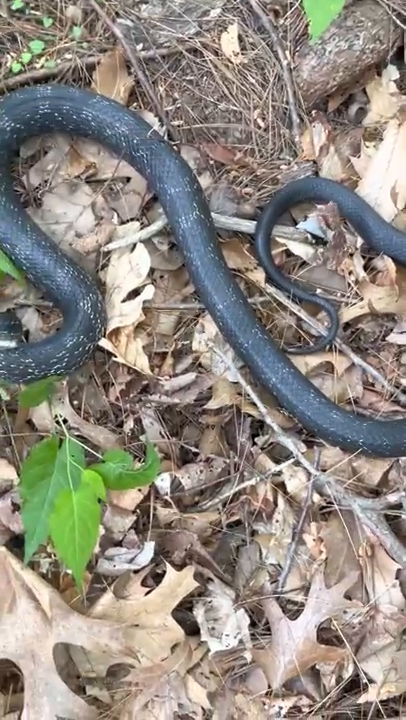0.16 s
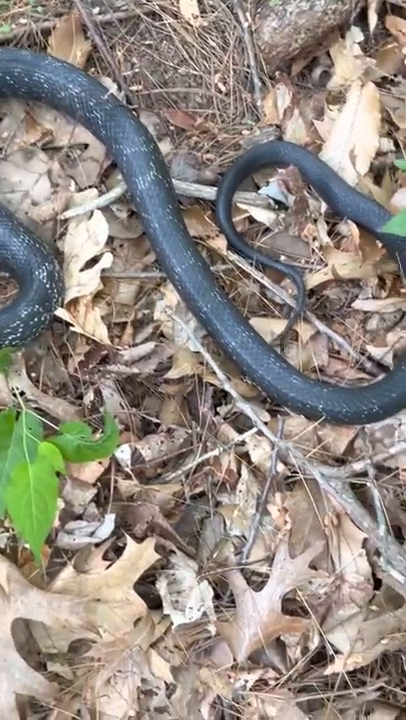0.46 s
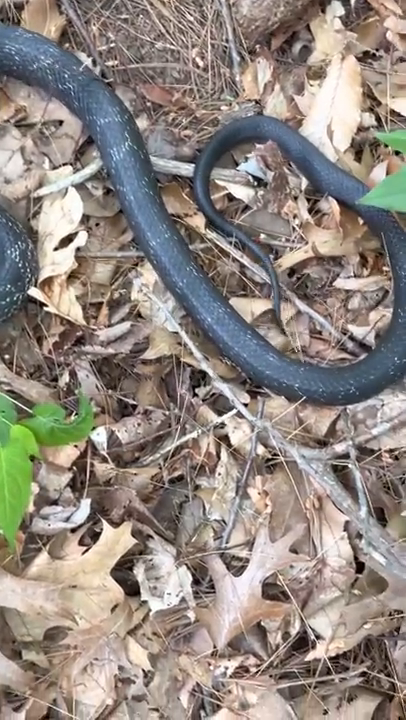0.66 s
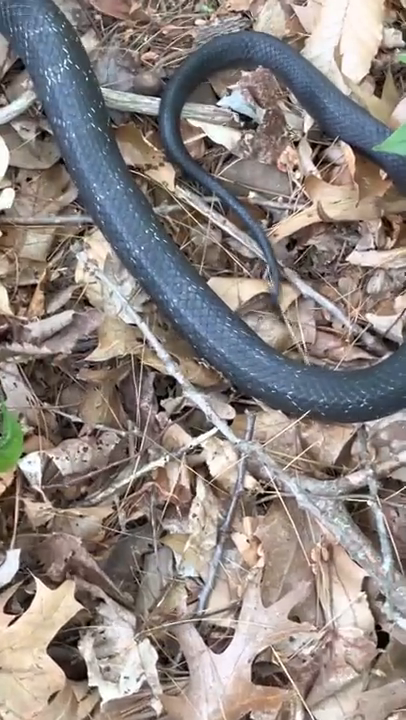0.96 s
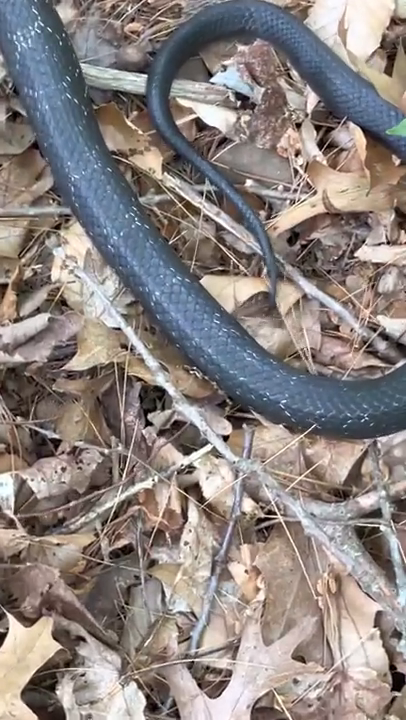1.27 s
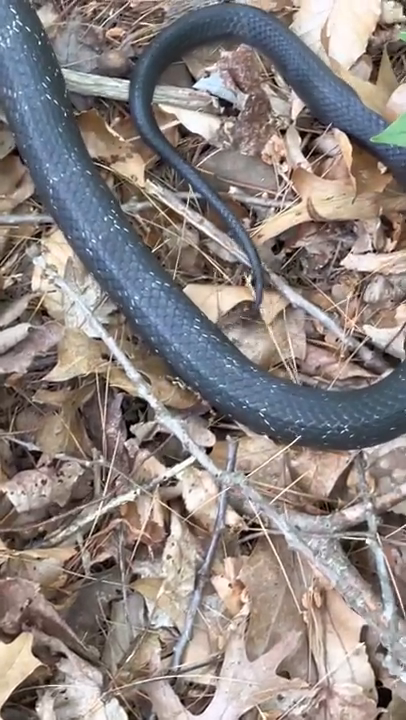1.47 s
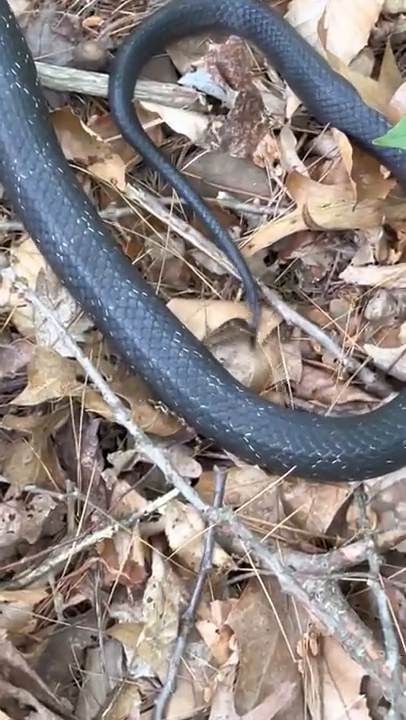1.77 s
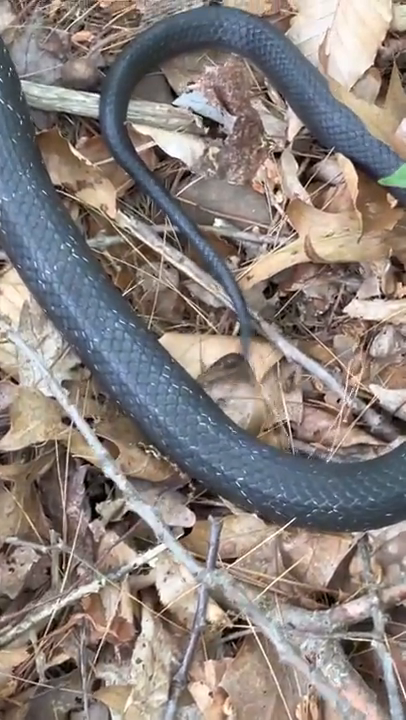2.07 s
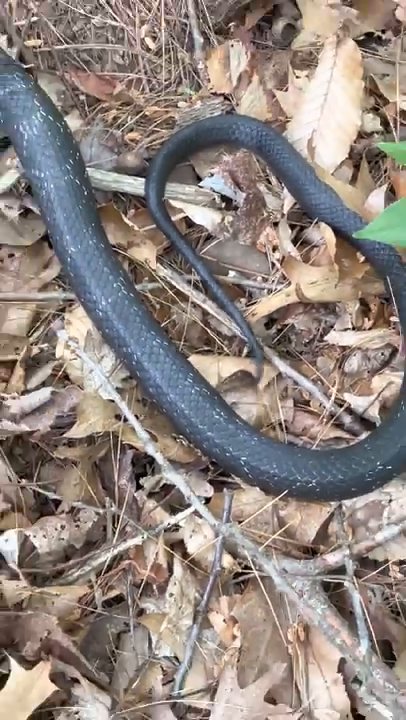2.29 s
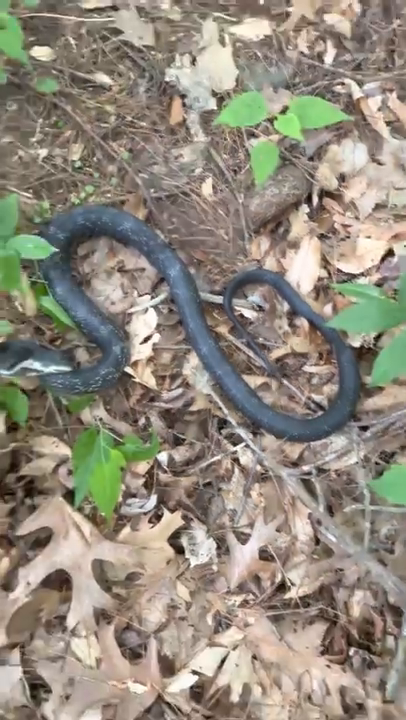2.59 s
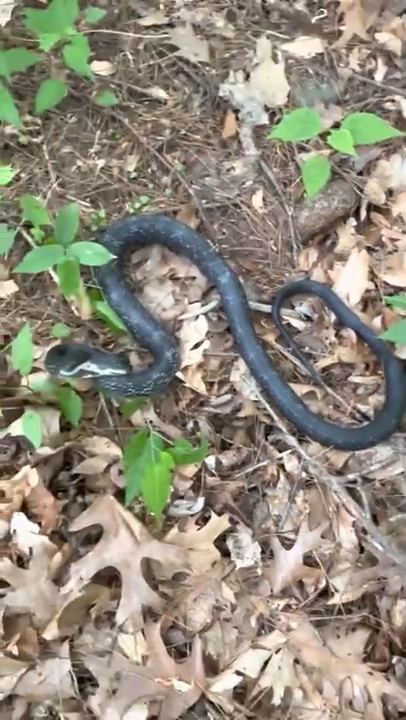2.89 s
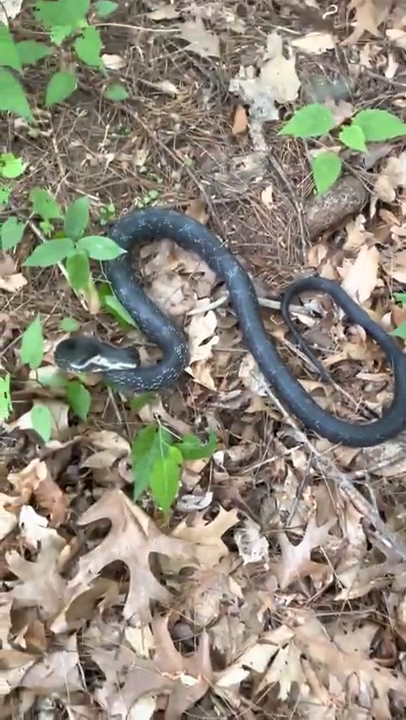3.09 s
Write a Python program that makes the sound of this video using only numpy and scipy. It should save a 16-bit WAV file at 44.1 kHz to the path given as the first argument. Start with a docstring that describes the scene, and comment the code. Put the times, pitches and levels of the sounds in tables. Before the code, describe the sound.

Close up in the woods, leaves and twigs tick lightly before a snake starts vibrating its tail in the dry litter. The rapid, papery rattle swells, then softens a little, with a faint far rumble and hiss behind.

```python
"""A far low rumble sounds under a steady background hiss, and dry leaves and twigs snap. The litter rustles
as a snake shivers its tail in it, about 35 swings a second, striking one leaf going out and another coming
back. Each impact excites the leaf's broad resonances; the hardest strokes slap. A phone's two microphone
ports give the hiss a bright peak near 11 kHz and add a phase offset that grows, unevenly, with frequency."""
import sys
import numpy as np
from scipy import signal
from scipy.fft import rfft, irfft, next_fast_len
from scipy.io import wavfile
from scipy.ndimage import uniform_filter1d

SR = 44100
rng = np.random.default_rng(int(sys.argv[2]) if len(sys.argv) > 2 else 0)


def master(y):
    """Save y as 16-bit WAV."""
    cut = np.clip(np.atleast_2d(y).T, -1, 1)
    pcm = np.round(cut * 32767)  # scale
    wavfile.write(sys.argv[1], SR, pcm.astype(np.int16))


N = 143325


def amp(db):
    """Amplitude ratio of a level in decibels."""
    return 10 ** (np.asarray(db) / 20)


def rms_one(x):
    """Normalisation to unit mean power."""
    return x / np.sqrt(np.mean(x ** 2) + 1e-20)


def read(rows, at):
    """Linear interpolation of a table's columns along its first."""
    axis, *columns = np.transpose(rows)
    return [np.interp(at, axis, c) for c in columns]


def colour(x, spectrum):
    """Spectral shaping: x is weighted by a spectrum and silent outside it."""
    hz, db = np.transpose(spectrum)
    grid = np.arange(N // 2 + 1) * SR / N + 1
    return irfft(rfft(x) * amp(np.interp(np.log(grid), np.log(hz), db, -120, -120)), N)


# envelope of the far rumble: (time [s], level [dB])
RUMBLE_LEVEL = [(0.0, -47), (1.29, -47.5), (2.87, -43.5), (3.25, -46)]
# spectra of the rumble and of the hiss: (frequency [Hz], relative density [dB])
RUMBLE_SPECTRUM = [(12, -55), (25, -31), (36, -21), (49, -4), (81, 1.5), (123, -4), (145, -9), (232, -14.5),
                   (308, -24), (500, -30.5), (650, -50)]
HISS_SPECTRUM = [(250, -4), (500, 0), (1500, -4.5), (3000, -7), (5500, -14.5), (7500, -6), (9000, -12),
                 (11000, -3), (12200, -22), (13500, -37), (16000, -47)]

def background():
    """Filtered white noise: a drifting far rumble, and steady hiss with a microphone peak near 11 kHz."""
    rumble_db, = read(RUMBLE_LEVEL, np.arange(N) / SR)
    rumble, hiss = rng.standard_normal((2, 2, N))
    rumble = amp(rumble_db) * rms_one(colour(rumble, RUMBLE_SPECTRUM))
    hiss = amp(-58) * rms_one(colour(hiss, HISS_SPECTRUM))
    return rumble + hiss


def grit(shape, per_s, spread_db):
    """Shot noise: random clicks of uneven size over a trace of hiss."""
    sizes = amp(spread_db * np.minimum(rng.exponential(1, shape), 5)) * rng.choice([-1, 1], shape)
    return sizes * (rng.random(shape) < per_s / SR) + 0.011 * rng.standard_normal(shape)


def resonate(x, hz, width_hz):
    """Heavily damped resonance; each row comes out with unit energy."""
    sos = signal.butter(1, [max(hz - width_hz / 2, 50), hz + width_hz / 2], "band", fs=SR, output="sos")
    y = signal.sosfilt(sos, signal.sosfilt(sos, x))
    return y / np.sqrt(np.sum(y ** 2, axis=-1, keepdims=True))


def impacts(times, levels_db, modes, envelope, grain_db, knock_db, knock_sample=28):
    """Modal superposition: a knock and a gritty burst drive each resonance. Rows: direct, indirect."""
    contact = envelope * grit((len(times), 2, envelope.shape[-1]), per_s=25000, spread_db=grain_db)
    knock = np.zeros_like(contact)
    knock[:, 0, knock_sample] = amp(knock_db)   # a clean impulse, on the direct path only
    bursts = 0
    for k, (db, (hz, width_hz)) in enumerate(zip(levels_db, modes)):
        force = contact + knock * (3000 / hz) ** 0.58   # the knock weighs more in low resonances
        bursts += (-1) ** k * amp(db)[:, None, None] * resonate(force, hz, width_hz)
    out = np.zeros((2, N + SR))
    samples = (times * SR).astype(int)[:, None] + np.arange(envelope.shape[-1])
    for path in range(2):
        np.add.at(out[path], samples, bursts[:, path])
    return out[:, :N]


# single snaps: (time [s], relative level [dB], treble share [dB], low share [dB], middle share [dB])
SNAPS = [(0.022, -37, -6.5, -29, -17), (0.0475, -40.5, -13, -3, -25), (0.0797, -41.5, -12, -18, -15),
         (0.1096, -50, -4, -12, -15), (0.139, -28, -7.5, -33, -21), (0.1496, -38, -4.5, -17, -12),
         (0.3732, -41, -18, -24, -6.5), (0.383, -45, -8, -16, -6), (0.4208, -34.5, -6.5, -29, -7.5),
         (0.4465, -42.5, -0.5, -20, -8), (0.4665, -45.5, -1, -14, -4), (0.4984, -24.5, -22, -14, -6),
         (0.5423, -30, -17, -19, -9), (2.6095, -30, -5, -30, -21)]
# low, middle and treble resonances of a snap: (frequency [Hz], bandwidth [Hz])
SNAP_MODES = [(1600, 1540), (4600, 5100), (11000, 2000)]

def snaps():
    """Impulsive excitation: leaves and twigs crack, each with its own balance of three resonances."""
    times, db, treble_db, low_db, middle_db = np.transpose(SNAPS)
    levels_db = 17.5 + db + np.array([low_db, middle_db, treble_db])
    decay_s = 0.0019
    envelope = np.exp(-np.arange(512) / (decay_s * SR))
    return impacts(times, levels_db, SNAP_MODES, envelope, grain_db=3.6, knock_db=-1)


# envelope of the shaken litter: (time [s], relative treble level [dB], relative middle level [dB])
RUSTLE_LEVELS = [(0.3, -80, -62), (0.46, -63, -63), (0.53, -48, -50), (0.65, -40, -45.5),
                 (0.71, -46.5, -51.5), (1.1, -41.5, -46.5), (1.28, -41.5, -47), (1.61, -42.5, -46),
                 (1.85, -41, -45), (2.0, -42, -46), (2.21, -45.5, -50), (2.55, -43, -47.5),
                 (2.83, -52.5, -51), (3.25, -43.5, -46)]
# spectra of its two bands: (frequency [Hz], relative density [dB])
RUSTLE_TREBLE = [(6000, -13), (7800, -17.5), (9000, -2), (10500, 1.5), (11600, -1), (12500, -2.5),
                 (14000, -10), (16000, -22)]
RUSTLE_MIDDLE = [(350, -5), (1200, -7.5), (2600, -1.5), (4000, 2.5), (5200, -2), (7000, -2), (8000, -4)]

def rustle():
    """Modulated shot noise: clicks of shaken leaves merge into a fine crackle that comes in patches."""
    treble_db, middle_db = read(RUSTLE_LEVELS, np.arange(N) / SR)
    drift = uniform_filter1d(rng.standard_normal(N), size=400)
    patches_db = 3 * rms_one(uniform_filter1d(drift, size=400))
    clicks = grit((2, N), per_s=9000, spread_db=3) * amp(patches_db)
    bands = [(treble_db, RUSTLE_TREBLE), (middle_db, RUSTLE_MIDDLE)]
    return sum(amp(db - 5) * rms_one(colour(clicks, spectrum)) for db, spectrum in bands)


# speed of the tail: (time [s], swing rate [Hz])
SWING_RATE = [(0.47, 35.82), (0.669, 36.73), (0.867, 38.74), (1.066, 35.53), (1.264, 36.21), (1.463, 34.96),
              (1.661, 36.14), (1.86, 34.45), (2.059, 35.25), (2.257, 33.84), (2.456, 33.75), (2.654, 33.61),
              (2.853, 33.41), (3.051, 33.44), (3.25, 32.52)]
# the tiring tail swings lopsided and slips once: (time [s], outward delay [s], return delay [s])
STROKE_DELAY = [(2.2, 0, 0), (2.3, .003, 0), (2.585, .005, 0), (2.6, .015, .011), (2.9, .017, .011),
                (3.25, .017, .010)]

def stroke_times():
    """Phase is the integral of frequency: the tail lands once every half cycle, later as it tires."""
    t = np.arange(N) / SR
    first_stroke_s = 0.4835
    half_cycles = 2 * np.cumsum(read(SWING_RATE, t)[0]) / SR
    half_cycles -= np.interp(first_stroke_s, t, half_cycles)
    times = np.interp(np.arange(int(half_cycles[-1])), half_cycles, t)
    for side in range(2):
        times[side::2] += read(STROKE_DELAY, times[side::2])[side]
    return times


# relative strength of strikes on each leaf: (time [s], low [dB], low-mid [dB], high-mid [dB], treble [dB])
OUTWARD_LEVELS = [(0.47, -48, -49, -66, -47), (0.53, -54, -62, -53, -54), (0.58, -47, -46, -33, -34.5),
                  (0.72, -44, -49, -49, -45), (0.9, -42, -47, -45.5, -49), (1.03, -48, -50.5, -44.5, -47),
                  (1.09, -36, -37, -31.5, -35.5), (1.23, -42, -40.5, -37, -39), (1.3, -45, -48, -37, -38),
                  (1.42, -46, -45, -33, -37), (1.5, -50, -43, -44, -44), (1.6, -54, -51, -47, -37),
                  (1.75, -58, -51, -62, -50), (1.9, -53, -45.5, -43, -39), (2.1, -44.5, -43, -36, -38),
                  (2.3, -57, -53.5, -50, -47), (2.6, -60, -53, -52, -42), (3.25, -54.5, -52, -43.5, -39)]
RETURN_LEVELS = [(0.47, -49, -27, -30, -30), (0.53, -55, -56.5, -57, -49), (0.58, -54, -59, -51, -54),
                 (0.72, -51, -51.5, -48.5, -44), (0.9, -51.5, -54, -46, -50), (1.03, -47, -52, -46, -40),
                 (1.09, -46, -48, -44, -41), (1.23, -55, -51, -46, -43), (1.3, -50, -51, -47, -54),
                 (1.42, -48, -40, -37, -35), (1.5, -58, -32.5, -37, -30), (1.6, -45, -31.5, -34, -28),
                 (1.9, -52, -43, -45, -35.5), (2.1, -67, -45.5, -45.5, -35), (2.3, -57, -47, -43, -36.5),
                 (2.6, -54, -48, -45.5, -39), (3.25, -49.5, -50.5, -44, -41.5)]
# the four resonances of each leaf, low to treble: (frequency [Hz], bandwidth [Hz])
OUTWARD_MODES = [(1300, 1800), (3300, 2350), (5100, 1950), (10300, 14000)]
RETURN_MODES = [(1200, 2040), (2800, 1400), (5700, 2900), (10500, 3500)]

def tail_strikes():
    """Impact and friction on two leaves in turn: hard strokes crack, soft ones mostly scrape."""
    strokes = stroke_times()
    slapped = np.abs(strokes[:, None] - np.array(SLAPS)[:, 0]).min(axis=1) < 0.007
    age = np.arange(1024) / SR
    attack_s, crack_s, jitter_s = 0.00024, 0.0011, 0.0004
    knock_db, hard_db = (14, 7), (-61, -48.5)   # pairs: outward leaf, return leaf
    scrape_db, scrape_s = (-13, -14), (0.0054, 0.012)
    attack = 1 - np.exp(-age / attack_s)
    leaves = [(OUTWARD_LEVELS, OUTWARD_MODES), (RETURN_LEVELS, RETURN_MODES)]
    out = 0
    for side, (strength, modes) in enumerate(leaves):
        times = strokes[side::2]
        strength_db = np.array(read(strength, times))
        chance = rng.standard_normal((200, 6))[:len(times)].T
        levels_db = strength_db + 20.5 + 0.36 * chance[4] + 0.9 * chance[:4]   # force and timbre vary
        levels_db[:, slapped[side::2]] = -120   # these strokes sound as slaps instead
        # a strike whose low band falls below hard_db loses crack and knock
        crisp_db = np.clip(2.1 * (strength_db[0] - hard_db[side]), -25, 0)
        crack = amp(crisp_db)[:, None, None] * np.exp(-age / crack_s)
        scrape = amp(scrape_db[side]) * np.exp(-(age / scrape_s[side]) ** 2)
        out += impacts(times + jitter_s * chance[5], levels_db, modes, attack * (crack + scrape),
                       grain_db=2.5, knock_db=knock_db[side] + crisp_db)
    return out


# hard slaps of the tail, as relative energy in five resonances and a share of scrape:
# (time [s], thump [dB], low [dB], low-mid [dB], high-mid [dB], treble [dB], scrape [dB])
SLAPS = [(0.5684, -32, -16.5, -22.5, -14.0, -22, -19), (0.5948, -27, -24.5, -29, -21, -18, -18),
         (0.6239, -25, -21, -24, -18, -22, -16), (0.6522, -26, -20, -28, -20, -23.5, -18),
         (0.678, -28, -20, -32, -15.5, -15.5, -7), (0.7053, -23, -21, -30, -26.5, -23, -7),
         (0.7318, -42, -23.5, -27.0, -28, -24.0, -12), (0.7576, -33.0, -22, -28.0, -24, -24.0, -3),
         (0.7862, -27, -21, -24, -27, -22, -17), (0.8124, -26, -23, -25, -32.5, -33.5, -25),
         (0.839, -29, -22, -21.5, -26.0, -29.5, -24), (0.8645, -27.0, -20, -35, -31, -29.0, -15),
         (0.891, -27, -24, -23, -27, -27, -12), (0.9166, -33, -24, -28, -28, -35, -12),
         (0.927, -39.5, -43.0, -29.5, -22, -18, -13), (0.943, -36.0, -23, -30.5, -25, -34, -2),
         (0.9701, -30, -23, -29, -23.0, -31.5, -17), (0.9968, -38.0, -28, -29, -35, -36, -19),
         (1.0252, -34, -25.5, -28.5, -26.0, -23.5, -5), (1.0515, -26, -19, -29, -23.5, -25, -5),
         (1.0799, -34, -15, -29, -11.5, -19.5, -38), (1.1075, -39, -15.5, -20, -15, -27, -16),
         (1.1348, -35, -17.5, -18, -15.5, -16.5, -19), (1.1617, -36, -16, -21, -14.5, -23, -18),
         (1.1885, -37, -20.5, -20.5, -14.5, -30, -16), (1.2155, -42, -17, -23, -25, -24, -9),
         (1.2453, -45, -18, -19.5, -8.5, -13, -41), (1.2723, -45, -26, -19.5, -18.5, -21, -5),
         (1.3002, -43, -19, -22.5, -18.5, -20, -4), (1.3336, -37.5, -25, -24, -16.5, -15, -18),
         (1.3552, -45, -22.0, -17.5, -22, -16, 1), (1.3838, -37.5, -23, -20.5, -14.5, -19, -3),
         (1.4119, -39, -23.5, -20, -15, -16, -4), (1.4263, -44, -26, -20, -15, -14, -8),
         (1.4733, -49, -31, -17.5, -27, -15, -19), (1.4832, -31, -27, -14.5, -20, -13, -11),
         (1.5, -47.0, -31, -15.5, -20.5, -16, -17), (1.5119, -30.0, -35, -10, -20, -12.5, -19),
         (1.5277, -50, -33, -22, -30, -21, -14), (1.5407, -27, -32, -12, -14, -8, -12),
         (1.5557, -45, -32, -27, -29, -33, -27), (1.5687, -35, -32, -9.5, -15.5, -7.5, -14),
         (1.584, -47, -38, -20, -33, -28, -19), (1.597, -36, -28, -9, -16.5, -9.5, -8),
         (1.6246, -30.0, -27, -12, -15.5, -6.5, -10), (1.6525, -27, -26, -12.5, -17.5, -9, -12),
         (1.6816, -35, -24.0, -18, -19, -12.5, -21), (1.7092, -31, -24.5, -13.5, -13.5, -7, -24),
         (1.7375, -27, -21.5, -16, -16.5, -11.5, -13), (1.766, -31, -22.5, -14.5, -15, -13.5, -12),
         (1.7958, -31, -28, -19, -16, -13.5, -11), (1.8095, -44, -41, -17.5, -27, -14, -17),
         (1.8242, -33.0, -28, -24, -24, -12.0, -19), (1.8366, -46.0, -36, -17, -22, -21, -12),
         (1.8524, -28.5, -23.0, -18, -15, -13, -14), (1.8821, -36.0, -29, -28.0, -11, -13.0, -14),
         (1.9089, -28, -27, -17, -20, -15, -13), (1.9516, -45.0, -34, -23.5, -18, -21, -29),
         (1.9672, -29.5, -30, -19.5, -20.5, -14.5, -13), (2.0078, -46.0, -40, -18, -18, -18.0, -27),
         (2.0248, -29, -25.0, -19, -17.5, -13.5, -6), (2.0668, -35, -31, -18, -17, -14, -28),
         (2.0949, -32.5, -33, -18.5, -20.0, -25, -10), (2.1236, -33, -28, -17.5, -21, -16, -17),
         (2.2854, -32, -39, -22, -23, -12, -13), (2.3127, -43, -41, -25, -20.5, -14.5, -7),
         (2.3727, -51, -39, -22, -21.5, -19, -4), (2.4024, -49.5, -41, -22.5, -19, -14.5, -1),
         (2.491, -47, -31.0, -22.5, -19.5, -16, -2), (2.5216, -43, -32, -18, -25, -15.5, -9),
         (2.5508, -48.0, -40, -24.5, -22, -17.5, -5), (2.5889, -43, -46, -26, -17.5, -9, -16),
         (2.6823, -31, -34, -26.0, -23, -20.0, -9), (2.7, -40, -34, -36, -37, -38, -26),
         (2.7308, -49, -37, -43, -38, -14.5, -40), (2.7608, -41, -32, -28.0, -21, -22, -25),
         (2.7737, -45.0, -44.5, -26, -26, -16.5, -15), (2.7915, -39, -30.0, -34, -27, -22, -32),
         (2.8214, -32, -38.0, -31.0, -35, -14, -39), (2.8329, -46.0, -32, -25.5, -22, -19.0, -2),
         (2.8513, -38, -33.0, -30.0, -27.0, -23.5, -16), (2.862, -38.0, -29.5, -23, -22, -17.5, -4),
         (2.8788, -37, -39, -28, -23, -25, -22), (2.9102, -33, -28.5, -26, -27, -26, -14),
         (2.94, -35, -31, -29, -22.5, -20, -28)]
# resonances of a slapped leaf, thump to treble: (frequency [Hz], bandwidth [Hz], gain [dB])
SLAP_MODES = [(579, 560, -2), (1257, 1070, -2), (2900, 2030, -1), (5640, 2500, -1), (11070, 4000, 0)]

def tail_slaps():
    """Impact with sliding friction: the tail scuffs in, cracks on the leaf and scrapes on."""
    times, *levels_db, scrape_db = np.transpose(SLAPS)
    hz, width_hz, gain_db = np.transpose(SLAP_MODES)
    scuff_s, crack_s, scrape_s, ring_up_s = 0.0013, 0.001, 0.0084, 0.0002
    scuff_samples = 150
    age = (np.arange(1024) - scuff_samples) / SR
    scuff = amp(-6.5) * np.exp(age / scuff_s)
    crack = np.exp(-age / crack_s)
    scrape = amp(scrape_db)[:, None, None] * np.exp(-(age / scrape_s) ** 2)
    envelope = np.where(age < 0, scuff, crack + scrape)
    knock_db = -2 - 0.75 * scrape_db   # a slap that scrapes more knocks less
    starts = times - scuff_samples / SR - ring_up_s
    return impacts(starts, levels_db + gain_db[:, None], zip(hz, width_hz), envelope,
                   grain_db=2.5, knock_db=knock_db, knock_sample=scuff_samples)


# share of sound scattered by the litter: (frequency [Hz], gain [dB])
SCATTERED_SHARE = [(15, -43), (90, -40), (170, -29), (300, -10.5), (1200, -11), (2500, -21.5), (4500, -6),
                   (9000, -19.5), (12500, -11), (14500, -8), (17000, -6)]

def scene():
    """Superposition: direct sound reaches the two ports in phase, scattered sound in antiphase."""
    direct, indirect = tail_strikes() + tail_slaps() + snaps() + rustle() + background()
    scattered = colour(indirect, SCATTERED_SHARE)
    return np.array([direct + scattered, direct - scattered])


# phase of the right port behind the left: (frequency [Hz], lag [half cycles])
PORT_LAG = [(1600, 0), (2150, 0.0247), (2650, 0.44), (3650, 0), (4300, 0.07), (4900, 1), (5600, 2.05),
            (6100, 2.5), (8000, 2), (9100, 3), (12300, 4), (13200, 3), (15500, 6), (17000, 11)]
# magnitude response of both ports: (frequency [Hz], gain [dB])
PORT_RESPONSE = [(6000, 0.5), (7500, -5), (10500, 1.5), (11800, 1), (12600, -6.5), (14500, -5), (15800, -8)]

def record(dry):
    """Linear filtering: the ports colour the treble, the right one lags, and a low-pass cuts the top."""
    size = next_fast_len(N + 2048)
    hz = np.arange(size // 2 + 1) * SR / size
    lag = np.exp(-1j * np.pi * np.outer([0, 1], read(PORT_LAG, hz)[0]))
    gain = amp(read(PORT_RESPONSE, hz)[0])
    ports = irfft(rfft(dry, size) * lag * gain, size)[:, :N]
    low_pass = signal.cheby2(14, 60, 16300, fs=SR, output="sos")   # 60 dB down from 16.3 kHz
    return signal.sosfilt(low_pass, ports)


dry = scene()
out = record(dry)
master(out)
```